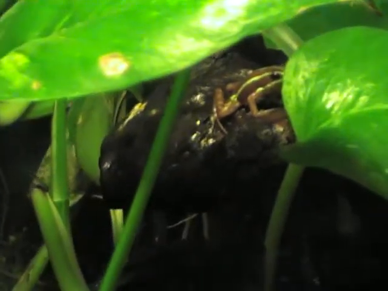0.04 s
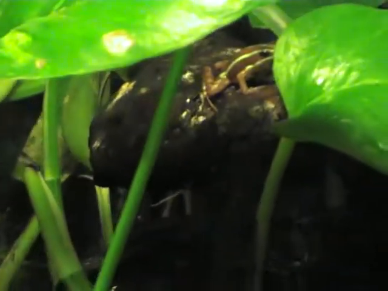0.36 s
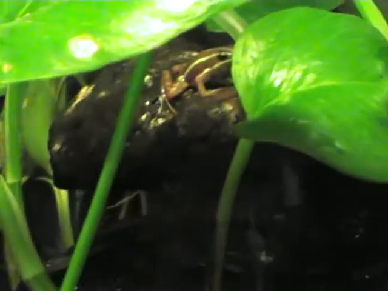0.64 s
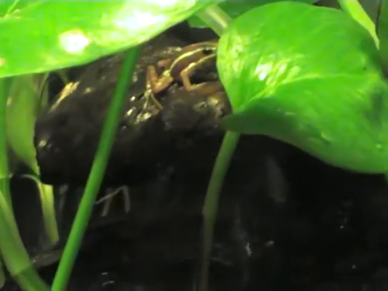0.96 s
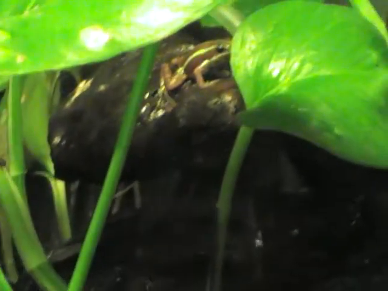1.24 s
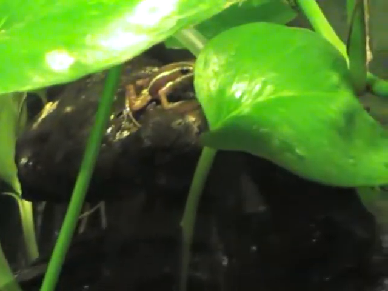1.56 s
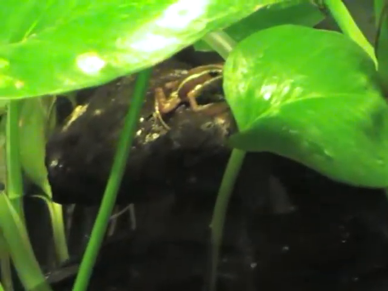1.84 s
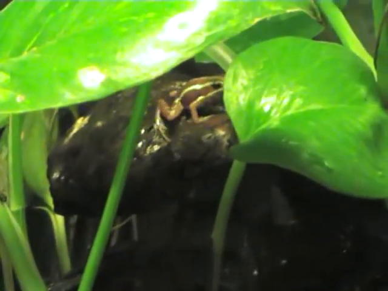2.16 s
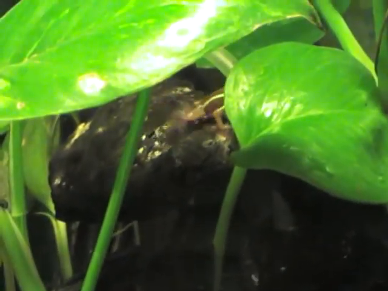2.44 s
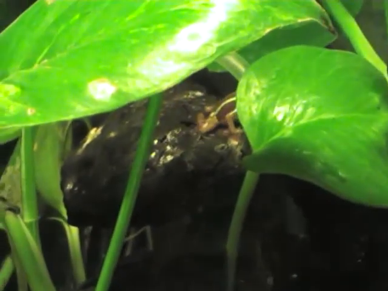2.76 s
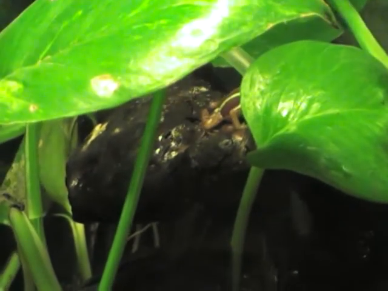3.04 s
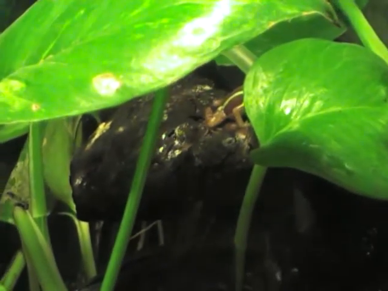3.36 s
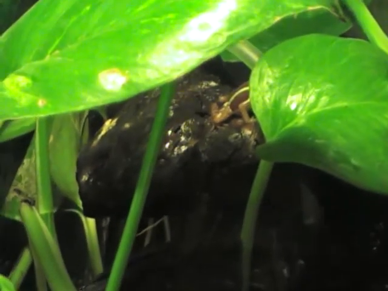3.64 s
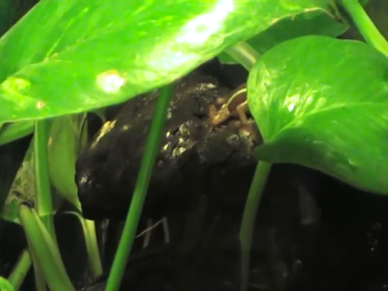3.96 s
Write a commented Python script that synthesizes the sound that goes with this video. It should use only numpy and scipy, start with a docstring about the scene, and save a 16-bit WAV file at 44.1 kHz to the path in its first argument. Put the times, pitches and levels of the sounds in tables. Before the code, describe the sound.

A tiny frog chirps close to the microphone, repeating a quick, whistling double note with a slight rasp. Between calls, water drops tick softly on stones and leaves, while a tank pump hums and air rushes steadily behind.

```python
"""A tiny frog on a wet rock in a planted tank chirps about every 0.6 s, two quick high notes per call.
Each note is a near-pure whistle with a grainy rasp and a closing tick. Drops tick on stones and leaves;
two bubbles ping in the water. The small space adds a short ring to frog, drops and bubbles.
Behind them a mains-driven pump hums over a steady rush of air with faint resonances."""
import sys
import numpy as np
from scipy import signal
from scipy.fft import rfft, irfft
from scipy.io import wavfile
from scipy.ndimage import uniform_filter1d

SR = 44100
rng = np.random.default_rng(int(sys.argv[2]) if len(sys.argv) > 2 else 0)


def generate_wav(signal):
    """Clip the signal to [-1, 1] and save it as 16-bit WAV at the path in sys.argv[1]."""
    frames = np.transpose(np.atleast_2d(signal))
    scaled = np.clip(frames, -1, 1) * 32767
    pcm = np.round(scaled).astype(np.int16)
    wavfile.write(sys.argv[1], SR, pcm)


N = 176400

# Air rush spectrum. Each row: frequency in Hz, relative density in dB.
AIR_SPECTRUM = [(25, -36), (40, -24), (60, -6.5), (100, -3.5), (170, 2), (350, -0.5), (560, 0.5), (640, -3),
                (1100, -4), (1450, -2.5), (1680, -0.5), (1950, -2), (2150, -4.5), (2550, -7), (3000, -12),
                (3900, -17), (5000, -16), (6000, -21), (7000, -26), (8400, -26), (10300, -25),
                (11500, -30.5), (13500, -37), (15600, -38.5)]
# Air rush stereo image. Each row: frequency in Hz, left-right correlation.
AIR_CORRELATION = [(50, 0.77), (100, 0.76), (150, 0.99), (300, 0.99), (1000, .93), (1800, 0.97),
                   (3500, 0.76), (5200, 0.77), (7000, 0.35), (9000, -0.13), (11000, -0.18), (15000, .12)]
# Resonances in the rush. Each row: centre in Hz, width in Hz, base level in dB, swell peak in seconds,
# swell in dB.
AIR_RESONANCES = [(1235, 47, -64, 0.59, 5.5), (1440, 32, -69, 0.18, 8), (1632, 45, -64, 2.33, 9),
                  (1707, 23, -59.5, 1.04, 6.5), (1755, 40, -62, 2.4, 5), (1840, 26, -59, 0.34, 3),
                  (1914, 30, -63, 0.89, 5.5), (2494, 66, -64, .6, 2)]
# Pump hum. Each row: multiple of the mains frequency, relative level in dB.
HUM_HARMONICS = [(1, -22), (3, -14.5), (4, 3), (5, -6.5), (6, 1.5), (7, 1), (8, -6.5), (9, -4.5),
                 (10, -16.5), (11, -3), (12, -12), (13, -14), (14, -12), (15, -11), (16, -8), (22, -10.5),
                 (27, -10), (32, -11.5)]
# Motor tones and whines. Each row: frequency in Hz, level in dB, right gain relative to left.
MOTOR_TONES = [(62.6, -67.5, 1), (436, -61.5, 1), (463, -58, 0.77), (528, -62.5, 0.9), (842, -65, 0.47),
               (10400, -84, -.4), (11418, -88, -.2)]
# Distinct drops. Each row: start in seconds, relative level in dB, centre in Hz, width in Hz.
CLEAR_DROPS = [(.397, -53, 6000, 600), (.685, -49.5, 5600, 1500), (.719, -45.5, 7200, 600),
               (1.270, -56, 12300, 2500), (1.575, -51.5, 7800, 1800), (1.853, -57, 8200, 1200),
               (1.935, -48.5, 13000, 2200), (1.997, -44, 6640, 900), (2.172, -47, 7000, 900),
               (2.349, -62, 14200, 1500), (2.587, -51.5, 7300, 1200), (2.828, -54, 8200, 900),
               (2.848, -47, 6950, 4500), (2.898, -49.5, 8000, 7000), (3.149, -49, 7900, 900),
               (3.495, -52, 11000, 7000), (3.497, -44, 6740, 600), (3.617, -50, 6560, 900),
               (3.643, -51, 8300, 1100)]
# Bubbles. Each row: start in seconds, level in dB, pitch in Hz.
BUBBLE_PINGS = [(0.772, -37.5, 2570), (1.454, -39.5, 1043)]
# Frog notes, two rows per call. Each row: peak in seconds, level in dB, pitch in Hz, roughness 0-1,
# rasp level in dB, rasp centre in Hz, relative tick level in dB.
FROG_NOTES = [(.1310, -40.5, 4690, 0.4, -61, 6200, -62), (.1710, -38.5, 4740, 0.2, -60, 7000, -60),
              (.8872, -32.5, 4695, 0.16, -60, 6000, -68), (.9268, -37, 4690, 0.26, -58, 5970, -61),
              (1.5665, -32, 4690, 0.1, -64, 6000, -70), (1.6060, -46.5, 4750, 0.25, -62, 6200, -56),
              (2.1515, -34, 4680, 0.2, -58, 6350, -70), (2.1915, -47, 4735, .22, -66, 6200, -60),
              (2.7865, -42, 4770, 0.54, -58, 5500, -65), (2.8265, -52, 4750, 0.4, -60, 6500, -57),
              (3.3530, -35, 4680, 0.12, -63, 6000, -70), (3.3968, -31.5, 4695, 0.14, -61, 6200, -70),
              (4.0000, -36, 4690, 0.15, -53, 6200, -73)]

WATER_RISE_S = 0.0011


def amp(db):
    """Decibels to gain."""
    return 10 ** (np.asarray(db) / 20)


def unit(x):
    """Scales to rms 1."""
    return x / np.sqrt(np.mean(abs(x) ** 2) + 1e-20)


def bell(x, width):
    """Gaussian, 1/e at the given width."""
    return np.exp(-(x / width) ** 2)


def read_curve(points, hz):
    """Interpolates a table on a log-frequency axis."""
    f, value = np.transpose(points)
    return np.interp(np.log(hz + 1), np.log(f + 1), value)


def add(mix, start_s, sound):
    """Mixes a sound in."""
    part = mix[max(round(start_s * SR), 0):][:len(sound)]
    part += sound[:len(part)]


def wobble(size, rate_hz):
    """Random motion up to about rate_hz, rms 1."""
    f = np.fft.rfftfreq(size, 1 / SR)
    return unit(irfft(rfft(rng.standard_normal(size)) * bell(f, rate_hz), size))


def band(size, hz, width_hz):
    """Noise in one resonance, rms 1."""
    f = np.fft.rfftfreq(size, 1 / SR)
    phasors = np.exp(2j * np.pi * rng.random(len(f)))
    return unit(irfft(phasors / (1 + (2 * (f - hz) / width_hz) ** 2), size))


def air(level_db=-44.5, patch_db=1.0, flutter_db=0.5):
    """Steady rush with faint drifting spectral patches; wide in the top hiss, else near centre."""
    frames, hz = N // 512 + 5, np.fft.rfftfreq(2048, 1 / SR)
    left_re, left_im, own_re, own_im, patches = rng.standard_normal((frames, len(hz), 5)).T
    patches = uniform_filter1d(patches, size=10, axis=0)
    patches = unit(uniform_filter1d(patches, size=12, axis=1))
    correlation = read_curve(AIR_CORRELATION, hz)[:, None]
    left = left_re + 1j * left_im
    right = correlation * left + np.sqrt(1 - correlation ** 2) * (own_re + 1j * own_im)
    spectra = np.array([left, right]) * amp(read_curve(AIR_SPECTRUM, hz)[:, None] + patch_db * patches)
    rush = signal.istft(spectra, nperseg=2048, noverlap=1536)[1][:, :N]
    return amp(level_db) * unit(rush * amp(flutter_db * wobble(N, rate_hz=26)))


def air_resonances(swell_s=0.38, hiss_start_db=-88, hiss_end_db=-72):
    """Noisy resonances in the rush, each swelling once, and a thin high hiss that grows."""
    t = np.arange(N) / SR
    ringing = sum(amp(db + swell_db * bell(t - peak_s, swell_s)) * band(N, hz, width_hz)
                  for hz, width_hz, db, peak_s, swell_db in AIR_RESONANCES)
    hiss = np.array([band(N, hz=9230, width_hz=450) for _ in range(2)])
    return ringing + amp(np.linspace(hiss_start_db, hiss_end_db, N)) * hiss


def pump(mains_hz=50, drift_hz=0.015, hum_db=-44, waver_depth=0.043):
    """Mains harmonics, each wavering in level, plus unrelated steady motor tones."""
    t = np.arange(N) / SR
    cycles = np.cumsum(mains_hz + drift_hz * wobble(N, rate_hz=0.8)) / SR
    hum, tones = np.zeros(N), np.zeros((2, N))
    for multiple, db in HUM_HARMONICS:
        waver = np.interp(t, np.linspace(0, t[-1], 24), rng.standard_normal(24))
        hum += amp(db) * (1 + waver_depth * waver) * np.sin(2 * np.pi * (multiple * cycles + rng.random()))
    for hz, db, right_gain in MOTOR_TONES:
        pan = unit(np.array([[1], [right_gain]]))
        tones += amp(db) * np.sqrt(2) * pan * np.sin(2 * np.pi * (hz * t + rng.random()))
    return amp(hum_db) * unit(hum) + tones


def tank_reverb(x, level_db=-10, t60_s=0.16, delay_s=0.00405, size=16384):
    """Short, dense reflections off glass and stone, different in each ear."""
    t = np.arange(size) / SR
    shared, per_ear = rng.standard_normal(size), rng.standard_normal((2, size))
    tail = (shared + 2.2 * per_ear) * (t > delay_s) * amp(-60 * t / t60_s)
    tail /= np.linalg.norm(tail[0])
    return amp(level_db) * signal.fftconvolve(x[None], tail, axes=1)[:, :N]


def bubbles(decay_s=0.0086, size=4096):
    """Bubbles ring in the water as damped sines."""
    out, t = np.zeros(N), np.arange(size) / SR
    envelope = (1 - np.exp(-t / WATER_RISE_S)) * np.exp(-t / decay_s)
    for start_s, level_db, hz in BUBBLE_PINGS:
        add(out, start_s, amp(level_db) * envelope * np.sin(2 * np.pi * hz * t))
    return out


def drop(relative_db, hz, width_hz, decay_s=0.0046, size=2048):
    """Tiny splash: a fast-dying burst of resonant noise."""
    t = np.arange(size) / SR
    envelope = (1 - np.exp(-t / WATER_RISE_S)) * np.exp(-t / decay_s)
    return amp(relative_db) * envelope / envelope.max() * band(size, hz, width_hz) / 2


def drips(faint_per_s=16, faint_db=-59, spread_db=8, treble_fall_db=7):
    """Distinct drops plus a random scatter of faint ones, softer the higher they are."""
    out = np.zeros(N)
    for start_s, *row in CLEAR_DROPS:
        add(out, start_s, drop(*row))
    for when, strength, pitch, width in rng.random((round(faint_per_s * N / SR), 4)):
        relative_db = faint_db + spread_db * (2 * strength - 1) - treble_fall_db * pitch
        add(out, when * N / SR, drop(relative_db, hz=5000 + 9000 * pitch, width_hz=800 + 3500 * width))
    return out


def whistle(t, hz, roughness, half_length_s=0.012, flutter_hz=310, second_db=-31.5, third_db=-36):
    """One arch of near-pure tone around t = 0; roughness flutters its phase and level."""
    arch = abs(np.cos(np.pi / 2 * np.clip(t / half_length_s, -1, 1))) ** 2.2
    phase = 2 * np.pi * np.cumsum(hz) / SR + roughness * wobble(len(t), flutter_hz) / 2
    tone = np.sin(phase) + amp(second_db) * np.sin(2 * phase) + amp(third_db) * np.sin(3 * phase)
    return arch * tone * (1 + roughness * wobble(len(t), flutter_hz))


def rasp(t, hz, width_s=0.011, grain_db=1.5):
    """Grainy hiss on a note."""
    hiss = band(len(t), hz, width_hz=3300)
    grain = amp(grain_db * wobble(len(t), rate_hz=1200))
    return bell(t, width_s) * unit(hiss * grain)


def closing_tick(t, delay_s=0.004, width_s=0.004):
    """Thin tick just after a note's peak."""
    return bell(t - delay_s, width_s) * band(len(t), hz=13000, width_hz=3500) / 2


def link_tone(t, level_db=-53, hz=4524, delay_s=0.013, width_s=0.015):
    """Faint lower tone between the two notes of a call."""
    return amp(level_db) * bell(t - delay_s, width_s) * np.sin(2 * np.pi * (hz * t + rng.random()))


def stone_ring(t, hz, relative_db=-54, lead_s=0.006, decay_s=0.016):
    """Blurred ring of the second note among the stones."""
    age = np.maximum(t + lead_s, 0) / decay_s
    envelope = 2 * np.sqrt(age) * np.exp(-age)
    return amp(relative_db) * envelope * band(len(t), hz, width_hz=320)


def frog(sag_hz_per_s=3500, rise_hz_per_s=3000, flat_db=-37, rise_span_db=7, size=8192):
    """Two-note calls. The first note sags; the second rises if below flat_db, sags if above."""
    out, t = np.zeros(N), (np.arange(size) - size // 2) / SR
    for index, (peak_s, level_db, hz, roughness, rasp_db, rasp_hz, tick_db) in enumerate(FROG_NOTES):
        first = index % 2 == 0
        glide_hz_per_s = -sag_hz_per_s if first else rise_hz_per_s * (flat_db - level_db) / rise_span_db
        note = amp(level_db) * whistle(t, hz + glide_hz_per_s * t, roughness)
        note += amp(rasp_db) * rasp(t, rasp_hz)
        note += amp(tick_db) * closing_tick(t)
        note += link_tone(t) if first else stone_ring(t, hz)
        add(out, peak_s + t[0], note)
    return out


def scene():
    """Frog and water close by, pump and air behind."""
    near = frog() + drips() + bubbles()
    return near + tank_reverb(near) + pump() + air() + air_resonances()


def record(dry):
    """Left channel slightly below right, then a low-pass."""
    balance_db, cutoff_hz = -0.5, 15720
    balanced = dry * amp(np.array([[balance_db], [-balance_db]]) / 2)
    lowpass = signal.firwin(1023, cutoff_hz, window=("kaiser", 9), fs=SR)
    return signal.oaconvolve(balanced, lowpass[None], "same")


dry = scene()
out = record(dry)
generate_wav(out)
```